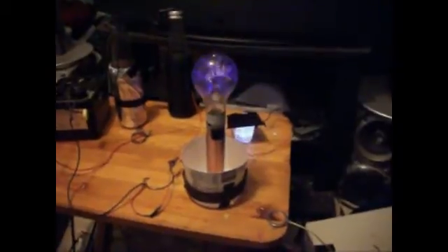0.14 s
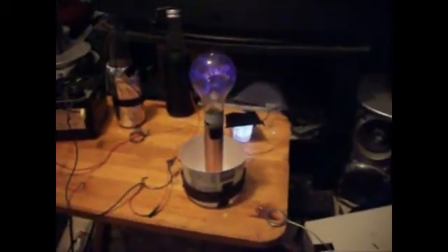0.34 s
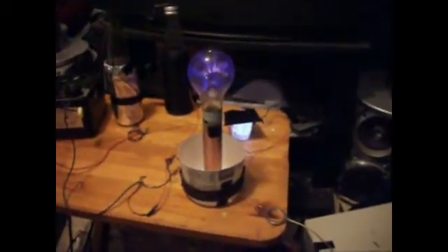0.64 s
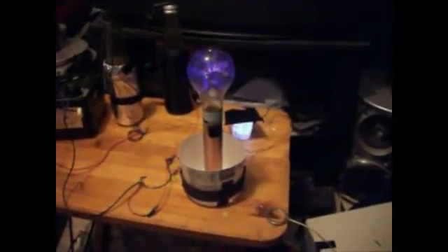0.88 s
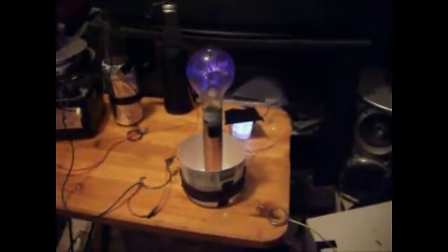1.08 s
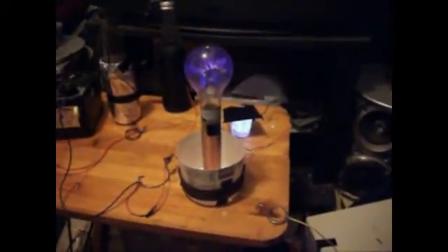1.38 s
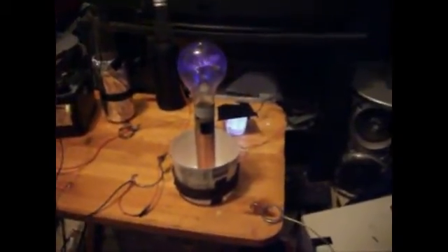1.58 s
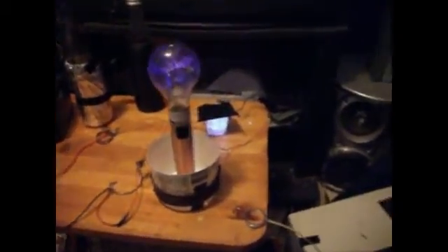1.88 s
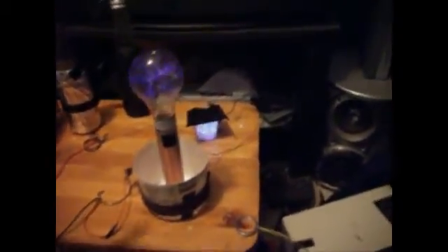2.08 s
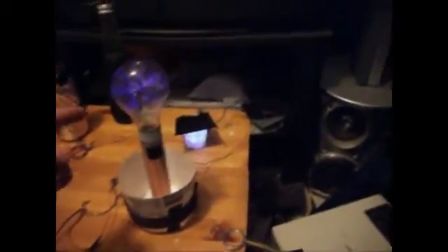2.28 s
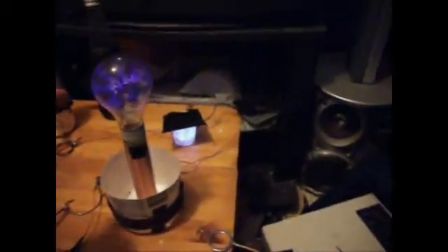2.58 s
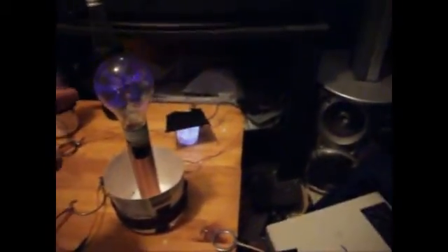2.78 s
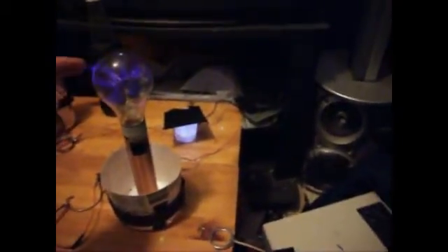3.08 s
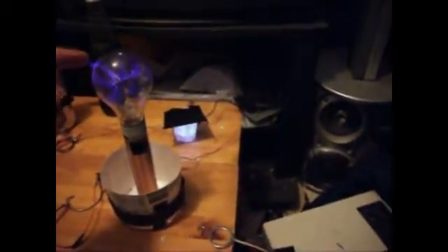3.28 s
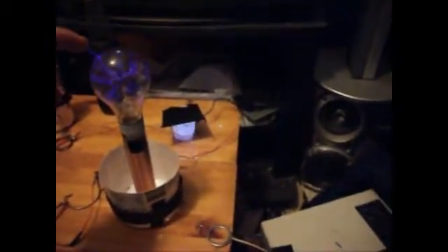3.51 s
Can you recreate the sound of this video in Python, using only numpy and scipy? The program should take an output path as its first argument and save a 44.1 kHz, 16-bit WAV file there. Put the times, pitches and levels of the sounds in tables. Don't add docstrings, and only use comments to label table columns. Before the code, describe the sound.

A loud harsh electrical buzz from a small spark coil rattles on steadily in a room.

```python
import sys
import numpy as np
from scipy import signal
from scipy.fft import rfft, irfft, next_fast_len
from scipy.io import wavfile
from scipy.ndimage import uniform_filter1d, minimum_filter1d, map_coordinates

SR = 44100
rng = np.random.default_rng(int(sys.argv[2]) if len(sys.argv) > 2 else 0)


def gain_from_decibels(decibels):
    exponent = np.asarray(decibels, float) / 20
    return 10 ** exponent


def int16_out(signal):
    q = np.round(np.clip(np.atleast_2d(signal).T, -1, 1) * 32767)
    wavfile.write(sys.argv[1], SR, q.astype(np.int16))


N = 160965
MAINS_HZ = 60.0

# pitch_hz, rms_level_db
CORE_TONES = [(659, -42), (720, -42.5), (838, -36.5), (957, -27.5), (1076, -28), (1116, -38.5),
              (1178, -26.5)]
# time_s, pitch_hz, level_db
WHISTLE_COURSE = [(0, 4615, -35.5), (.15, 4626, -35), (.2, 4640, -48.5), (.55, 4590, -46), (.62, 4660, -42),
                  (.95, 4640, -39.5), (1.0, 4640, -49.5), (1.75, 4595, -44), (1.85, 4612, -37),
                  (2.09, 4544, -44.5), (2.12, 4578, -31.5), (2.21, 4517, -29.5), (2.25, 4533, -35),
                  (2.31, 4545, -29.5), (2.62, 4540, -32.5), (2.72, 4526, -39.5), (2.82, 4506, -28.5),
                  (3.65, 4556, -31)]
# time_s, level_db, burst_length_ms, other_half_cycle_db, brightness_db
ARC_COURSE = [(0, -17, 5, -9, 5.5), (.17, -16.5, 4.6, 1.5, 7.5), (.22, -15.5, 5.2, -13, 0.3),
              (.65, -15.5, 6.2, -18.5, 1), (1.0, -14, 4.6, -16, 0), (1.75, -15, 5.48, -17, 6),
              (1.85, -14.5, 6.76, -9.5, -0.4), (2.12, -15, 5.5, -8, 0.3), (2.17, -14, 5.1, -20, -1.2),
              (2.4, -13, 6.3, -15.5, -7), (3.05, -14, 6.3, -10, 0), (3.12, -14, 6.3, -12, -2),
              (3.65, -13.5, 6.3, -19.5, 4.5)]
# time_s, peak_db
STRONG_SPARKS = [(0.195, -6.5), (0.413, 2.5), (0.482, -2), (0.564, 14), (0.68, -6), (0.793, 3.5),
                 (0.929, -5), (1.078, -3), (1.11, -7.5), (1.211, 6.5), (1.247, -6.5), (1.296, 9),
                 (1.394, -5), (1.544, -4.5), (1.629, 10.5), (1.811, -2), (1.911, -1.5), (2.229, -9),
                 (2.697, 22), (2.912, 16.5), (3.064, 13.5), (3.233, 11.5)]
# frequency_hz, gain_db
BODY_COLOUR = [(60, -30.5), (500, -23), (750, -11.5), (1050, 4.3), (1500, -6), (1900, -6), (2500, -26),
               (5500, -20)]
# time_s, level_db
UPPER_HOLLOW = [
    (0, -14.5),
    (.45, -15),
    (.6, -10),
    (1.2, -14),
    (1.4, -15.5),
    (2.1, -14),
    (2.3, -17.5),
    (3.65, -16),
]
# frequency_hz, gain_db
SNAP_COLOUR = [(1500, -24), (2400, -1), (3400, -0.5), (3700, 1), (4000, 2), (4350, -2.8), (4800, -9),
               (5600, -4)]
# time_s, added_fullness_db, ring_db
HAND_COURSE = [
    (0, -15, -2),
    (.2, -41, -11),
    (.45, -30, -10.5),
    (.55, -35.5, -15.5),
    (1.7, -30, -11),
    (1.9, -10.5, -10.5),
    (2.7, -4, -11.5),
    (3.65, -9, -9.5),
]
# frequency_hz, gain_db
HAND_COLOUR = [(450, -31), (700, -9), (900, 3.5), (1200, -24), (2000, -11), (2600, -5.5), (3400, -12),
               (4000, -11.5)]
# delay_s, level_db
WALL_ECHOES = [
    (.0031, -27),
    (.0068, -21.5),
    (.0097, -19),
    (0.0143, -12),
]
# centre_hz, width_hz, level_db
ROOM_MODES = [(944, 75, -7.5), (1148, 31, -10), (1393, 62, -2), (1480, 44, -11), (1512, 74, -8)]
# frequency_hz, gain_db
OUTPUT_SMOOTHING = [(3000, 1.83), (4600, 0.5), (5500, -5.5), (6450, -13), (7700, -27.5), (8900, -46.5),
                    (10000, -56.5), (11000, -85)]
OVERSHOOT_TIMES = [.930, 1.115, 3.232]
OVERSHOOT_LEVELS = [2.2, 2.6, 1.3]

STRIKE_S, STRIKE_JITTER_S = 0.0121, 0.0004
OTHER_S, OTHER_LONG = 0.0085, 1.3


def unit(x):
    return x / np.sqrt(np.mean(x ** 2) + 1e-20)


def along(points, hz):
    f, v = np.transpose(points)
    return np.interp(np.log(hz + 1), np.log(f + 1), v)


def curves(rows):
    s, *columns = np.transpose(rows)
    return [np.interp(np.arange(N) / SR, s, column) for column in columns]


def wobble(rate):
    knots = rng.standard_normal(N // 20)
    return map_coordinates(knots, [np.arange(N) * rate / SR])


def filtered(x, response):
    m = next_fast_len(N + SR // 2)
    return irfft(rfft(x, m) * response(np.fft.rfftfreq(m, 1 / SR)), m)[:N]


def causal(points):
    def response(hz):
        cepstrum = irfft(np.log(gain_from_decibels(along(points, hz))))
        cepstrum[1:len(hz) - 1] *= 2
        cepstrum[len(hz):] = 0
        return np.exp(rfft(cepstrum))
    return response


def resonance(centre_hz, width_hz):
    return lambda f: 1j * f * width_hz / (centre_hz ** 2 - f * f + 1j * f * width_hz)


def room(x):
    t = np.arange(SR // 3) / SR
    t60_s, tail_db = 0.1, -24
    tail = rng.standard_normal(len(t)) * gain_from_decibels(-60 * t / t60_s) * (t > .004)

    def early(f):
        echoes = sum(gain_from_decibels(db) * np.exp(-2j * np.pi * f * s) for s, db in WALL_ECHOES)
        modes = sum(gain_from_decibels(db) * resonance(c, w)(f) for c, w, db in ROOM_MODES)
        return 1 + echoes + modes

    diffuse = signal.fftconvolve(x, tail / np.linalg.norm(tail))[:N]
    return filtered(x, early) + gain_from_decibels(tail_db) * diffuse


def core_buzz():
    t = np.arange(N) / SR
    sway_db, sway_rad = 3, 1.31
    throb = 1 + 0.41 * np.cos(4 * np.pi * MAINS_HZ * (t - .015))
    tones = 0
    for hz, db in CORE_TONES:
        level = np.sqrt(2) * gain_from_decibels(db - 2.5 + sway_db * wobble(9))
        tones = tones + level * np.sin(2 * np.pi * hz * t + sway_rad * wobble(12))
    return throb * tones


def since_strike(delay_s):
    jitter = STRIKE_JITTER_S * rng.standard_normal(N // 100)
    turns = (np.arange(N) / SR - delay_s) * MAINS_HZ + 2
    cycle = turns.astype(int)
    return cycle, (turns - cycle) / MAINS_HZ - jitter[cycle]


def whistle():
    hz, level_db = curves(WHISTLE_COURSE)
    lag_s, lowest_t60_s, wander_hz = 0.0025, 0.019, 24.3
    cycle, age = since_strike(STRIKE_S + lag_s)
    age = np.abs(age)
    t60_s = lowest_t60_s * np.exp((hz - hz.min()) / 110)
    cycle_db = 2.7 * rng.standard_normal(N // 100)[cycle]
    decay = gain_from_decibels(-60 * age / t60_s + 1.5 * wobble(14) + cycle_db)
    onset = 1 - np.exp(-age / 0.0018)
    phase = 2 * np.pi * np.cumsum(hz + wander_hz * wobble(110)) / SR
    return gain_from_decibels(level_db + 2.5) * unit(decay * onset * np.sin(phase))


def strong_sparks():
    t = np.arange(N) / SR
    spark_s, lull_s, lull_depth, most_extra = .002, .006, .5, .8

    def bump(s, width_s):
        return np.exp(-((t - s) / width_s) ** 2)

    extra = lull = 0
    for s, db in STRONG_SPARKS:
        extra = extra + np.minimum(gain_from_decibels(.6 * db - 3), most_extra) * bump(s + spark_s, spark_s)
        lull = lull + bump(s - lull_s, lull_s / 2)
    return 1 + extra, 1 - lull_depth * lull


def burst(delay_s, length_s):
    sparks_per_s, size_db, cycle_db, first_db = 3500, 2.5, 1.96, 4.5
    cycle, age = since_strike(delay_s)
    draw = rng.random(N)
    size = gain_from_decibels(size_db * rng.standard_normal(N)) * np.sign(rng.standard_normal(N))
    skewed_age = np.clip(age / length_s, 0, 1) ** 1.5
    arch = np.sqrt(np.abs(np.sin(np.pi * skewed_age))) * (age < length_s)
    first = gain_from_decibels(first_db) * ((age >= 0) & (age < 1 / SR))
    sparks = arch * size * (draw < sparks_per_s / SR) - first
    heard = filtered(sparks, causal(BODY_COLOUR)) ** 2 * (age < length_s + .001)
    charge = np.bincount(cycle, heard, N // 100) + heard.mean()
    evenness = .9
    cycle_gain = gain_from_decibels(cycle_db * rng.standard_normal(N // 100)) * charge ** (-evenness / 2)
    return cycle_gain[cycle] * sparks


def arc():
    level_db, length_ms, other_db, bright_db = curves(ARC_COURSE)
    near_db, ring_db = curves(HAND_COURSE)
    upper_db, = curves(UPPER_HOLLOW)
    extra, lull = strong_sparks()

    main = unit(burst(STRIKE_S, length_ms / 1000)) * extra
    other = unit(burst(STRIKE_S + OTHER_S, OTHER_LONG * length_ms / 1000))
    other = gain_from_decibels(other_db + 3.3 * wobble(25.15)) * other
    corona_db = -19 + .5 * other_db + 5 + 4.1 * wobble(40)
    corona = gain_from_decibels(corona_db) * rng.standard_normal(N)

    discharge = main + other + corona
    body = gain_from_decibels(level_db) * unit(filtered(discharge, causal(BODY_COLOUR)))
    upper = unit(filtered(discharge, resonance(1410, 250)))
    body = body + gain_from_decibels(level_db + upper_db) * upper

    sharp = main + gain_from_decibels(-26.5) * other + gain_from_decibels(12.5) * corona
    ring = gain_from_decibels(ring_db) * unit(filtered(sharp, resonance(2085, 170)))
    snap = gain_from_decibels(bright_db - 15) * unit(filtered(sharp, causal(SNAP_COLOUR)))
    near = gain_from_decibels(near_db - 2) * unit(filtered(sharp, causal(HAND_COLOUR)))
    return lull * body, lull * gain_from_decibels(level_db) * (snap + ring + near)


def scene():
    body, snap = arc()
    return (gain_from_decibels(-3.0) * room(body) + snap + whistle() + core_buzz())[None]


def roll_off(x):
    return signal.sosfilt(signal.butter(12, 15800, fs=SR, output="sos"), x)


def record(dry):
    gain_s, squeeze = 0.0091, 0.25
    power = np.abs(filtered(dry[0] ** 2, lambda f: 1 / (1 + 2j * np.pi * f * gain_s))) + 0.0026
    x = dry[0] * (power / power.mean()) ** (-squeeze / 2)

    x = x + 0.24 * filtered(x ** 2, lambda f: 1 / (1 + 1j * f / 900))
    top, knee = .95, 5
    x = x / (1 + np.abs(x / top) ** knee) ** (1 / knee)

    step = 4
    x = filtered(x, lambda f: f < SR / step / 2) * (np.arange(N) % step == 0) * step
    x = filtered(x, lambda f: gain_from_decibels(along(OUTPUT_SMOOTHING, f)))

    ceiling = .9
    hold = minimum_filter1d(ceiling / np.maximum(np.abs(x), ceiling), size=260)
    hold = uniform_filter1d(uniform_filter1d(hold, size=120), size=120)
    t = np.arange(N) / SR
    overshoot_db = sum(db * np.exp(-((t - s) / .004) ** 2) for s, db in zip(OVERSHOOT_TIMES, OVERSHOOT_LEVELS))
    x = np.clip(x * hold * gain_from_decibels(overshoot_db), -1, 1)
    return roll_off(x[None])


dry = scene()
out = record(dry)
int16_out(out)
```